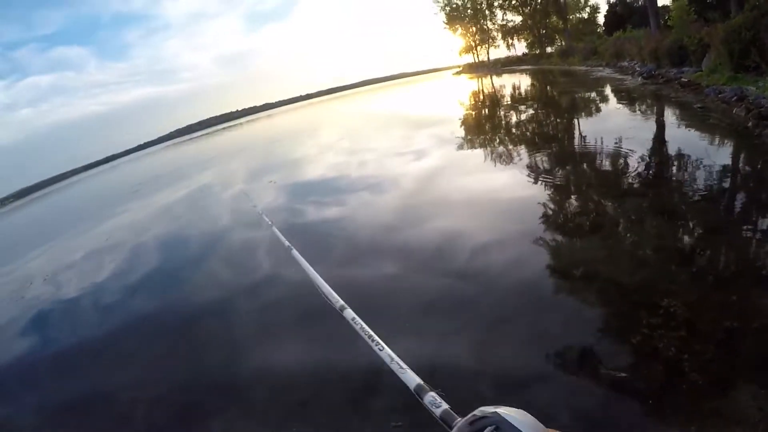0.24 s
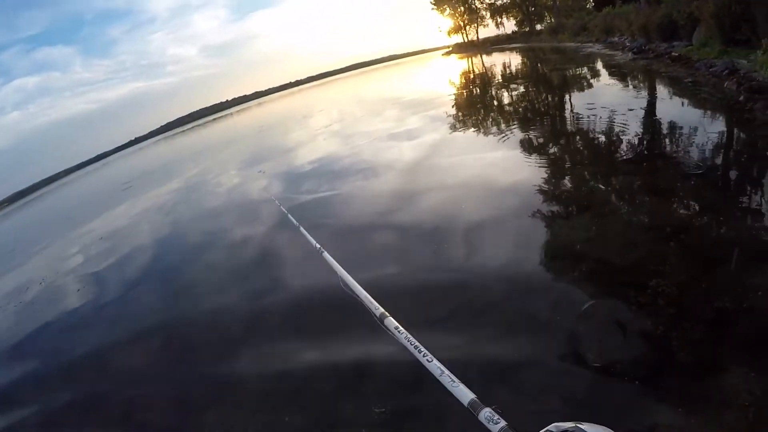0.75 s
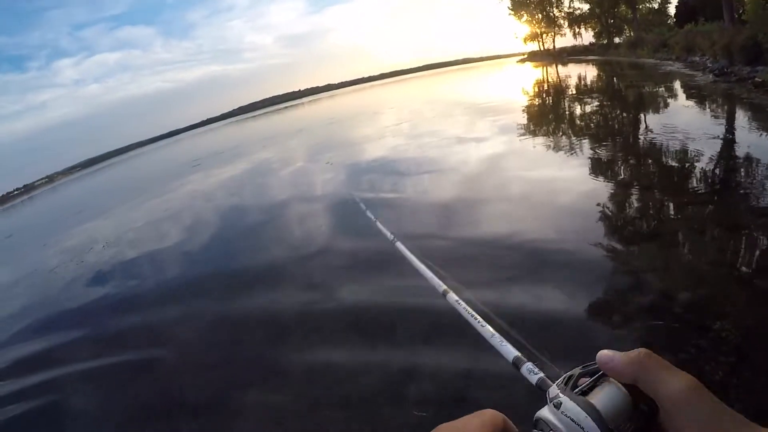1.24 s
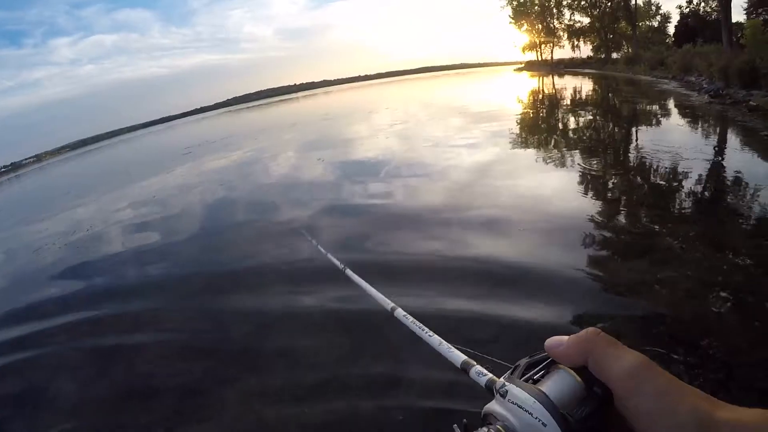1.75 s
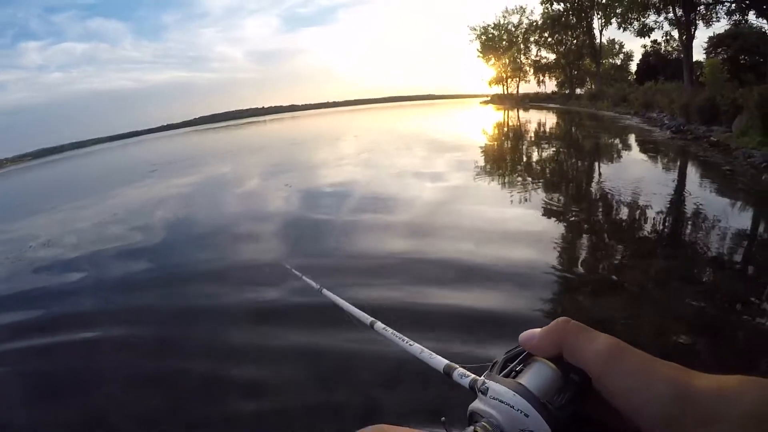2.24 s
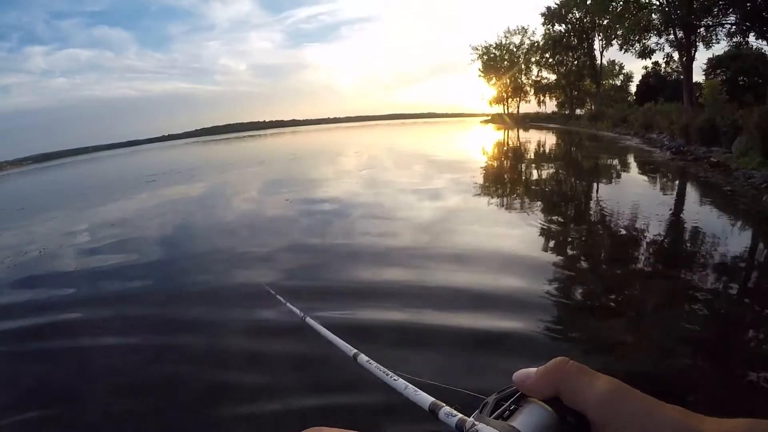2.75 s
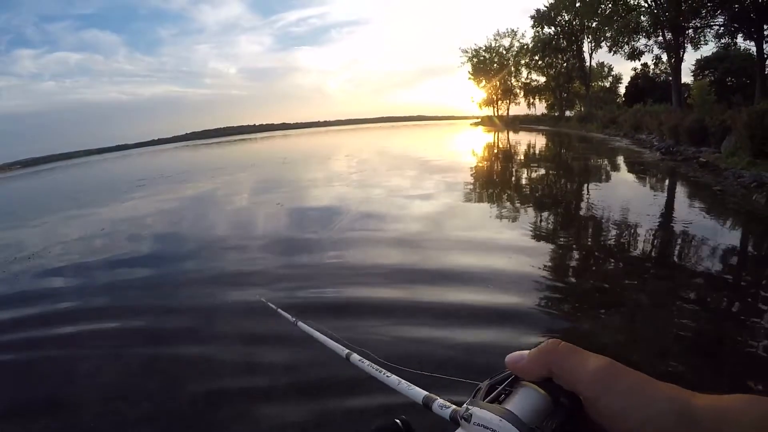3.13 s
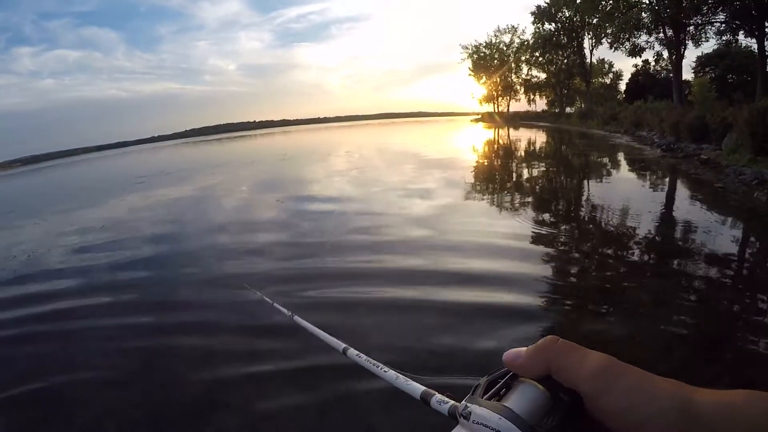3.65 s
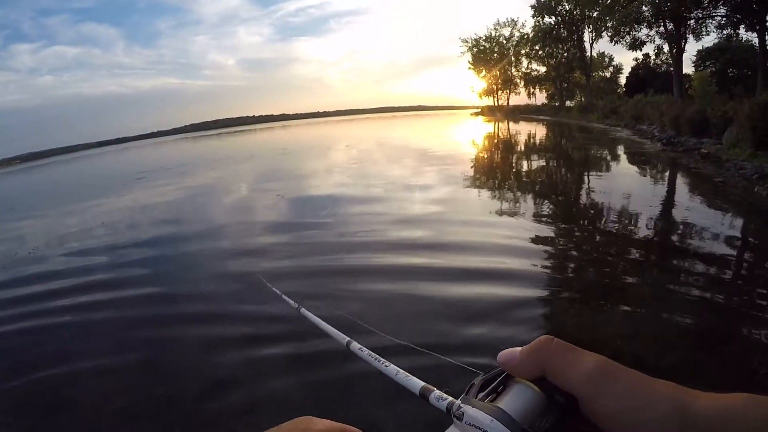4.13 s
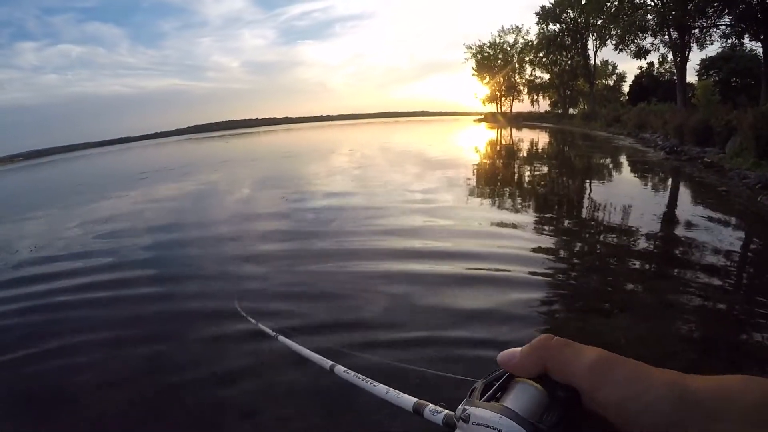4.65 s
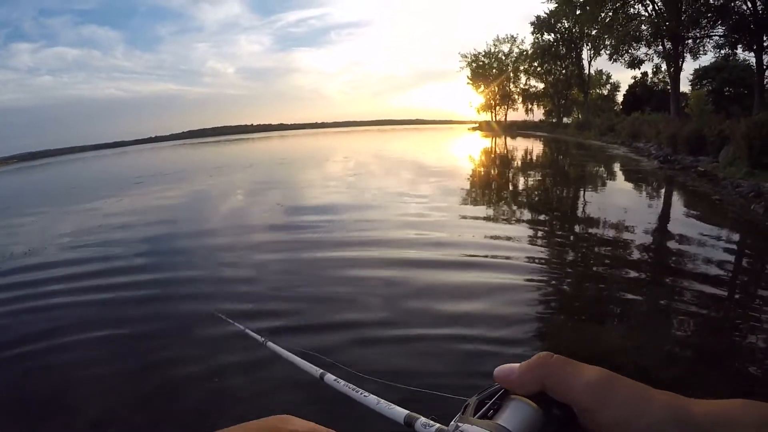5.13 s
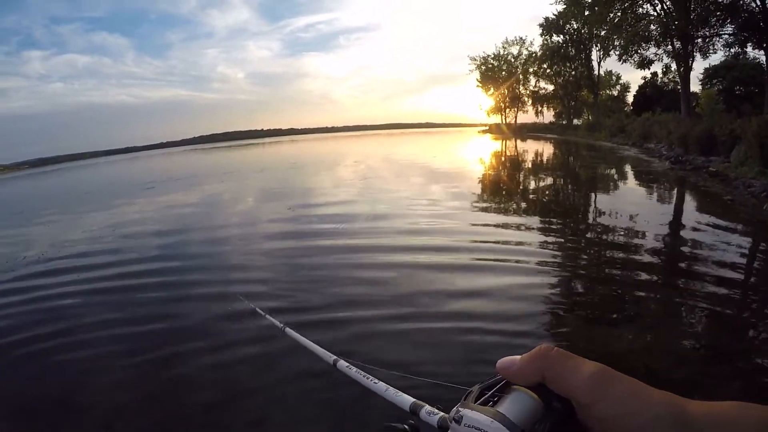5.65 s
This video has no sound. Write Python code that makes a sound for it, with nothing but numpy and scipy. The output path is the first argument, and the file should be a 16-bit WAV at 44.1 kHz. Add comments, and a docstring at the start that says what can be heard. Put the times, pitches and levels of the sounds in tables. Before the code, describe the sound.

Water plops and bubbles beside a lake, a fishing reel clacks sharply into gear, then faint winding continues under insects and low wind.

```python
"""Winding in a line on a calm lake shore

Filtered noise gives the wind, with buffeting below and rush above, over a far motor's wavering sines.
Insects ring from the trees as noise bands and steady singers; a nearer caller rasps in chirps.
Water sloshes as random grains and chirped bubbles, while drops and ticks are short contact bursts.
The reel engages with a clack of seven blows, damped modes and a short rough burst; noise bands form
the line's whisper, the rub of the crank and the faint whirr of the gears."""
import sys
import numpy as np
from scipy import signal
from scipy.fft import rfft, irfft, next_fast_len
from scipy.io import wavfile

SR = 44100
rng = np.random.default_rng(int(sys.argv[2]) if len(sys.argv) > 2 else 0)


def to_wav(sig):
    """Store sig (one row per channel, or 1-D mono) as 16-bit WAV at the path in sys.argv[1].

    Samples outside -1..1 are clipped; the rate is SR.
    """
    pcm = np.clip(np.atleast_2d(sig), -1, 1) * 32767
    pcm = np.round(pcm).astype(np.int16)
    wavfile.write(sys.argv[1], SR, pcm.T)  # frames by channels


N = 259749
TIME = np.arange(N) / SR
KHZ = 1000  # reference frequency [Hz]

# Wind spectrum: (frequency [Hz], relative density [dB per Hz])
WIND_SPECTRUM = [(7.1, -48), (12, -1), (27, -1.5), (69, 1.5), (91, -3), (119, -4.5), (191, -14),
                 (237, -13.5), (356, -20), (391, -20), (661, -29), (728, -30), (800, -29), (1420, -41),
                 (3600, -48), (4680, -77), (7920, -120)]
# Gusts and lulls: (middle [s], length [s], change of buffeting [dB], change of rush [dB])
WIND_GUSTS = [(1.848, 0.52, -2, 0), (3.122, 1, 1.5, 0.5), (3.617, 0.52, 4, -1.5), (4.557, 0.51, 0, 1),
              (4.877, 0.58, 2, 0.5), (5.6, 1, 1.5, 0)]
BUFFET_DB, RUSH_DB, HISS_DB = -39, -47, -71  # steady breeze, before gusts and wander
BUFFET_SPLIT_HZ = 160  # buffeting below, rush above

# Lines of the far motor's hum: (frequency [Hz], level [dB])
MOTOR_LINES = [(112.6, -50), (243, -60)]

# Insect chorus spectrum: (frequency [Hz], relative density [dB per Hz])
CHORUS_SPECTRUM = [(2500, -31), (3600, -18), (4000, -11), (4300, -7), (4700, -3.5), (5350, -5), (6000, -2),
                   (6600, -1.5), (7400, -4), (8200, -7), (8700, -10.5), (9300, -11.5), (9700, -22),
                   (11000, -34)]
# Chorus loudness, shared by crowd and caller: (time [s], level against CHORUS_OFFSET_DB [dB])
CHORUS_LEVEL = [(0.0, -55), (0.26, -54), (0.72, -51.5), (1.2, -53.5), (2.23, -53), (3.23, -52),
                (5.35, -52.5), (5.89, -52)]
# Single insects that stand out: (frequency [Hz], level [dB])
STEADY_SINGERS = [(4577, -73), (4643, -73), (4812, -77), (5130, -78), (5879, -74), (6540, -73), (6659, -71),
                  (6750, -73), (7218, -77), (7387, -77), (7456, -76), (7768, -77), (9232, -85)]
# Pitches favoured by many insects: (frequency [Hz], half-width [Hz], level [dB])
PITCH_CLUSTERS = [(4640, 70, -66), (6670, 110, -63)]
# Pace of the nearest insect: (time [s], rate [chirps per s])
CALLER_PACE = [(0, 12.15), (1.6, 12.15), (1.9, 11.88), (3.6, 11.92), (4, 11.62), (5.89, 11.35)]
CHORUS_OFFSET_DB, CALLER_DB = -0.37, -7.5  # the caller is set against the crowd
TOOTH_HZ, TOOTH_DEPTH, STROKE_DUTY = 345, .4, 0.77  # mean strike rate, depth, sounding share of a chirp
SINGER_HALF_WIDTH_HZ = 9.1

# Slosh spectrum: (frequency [Hz], relative density [dB per Hz])
SLOSH_SPECTRUM = [(220, -28), (350, 0), (600, 2), (950, -0.5), (1250, -2), (1550, -0.5), (2400, -6.5),
                  (3000, -11), (4200, -11.5), (7000, -29), (14000, -45)]
# Sloshes of water, and last a short rough burst under the reel's clack:
# (start [s], length [s], strength [dB])
SLOSH_EVENTS = [(-.01, 0.38, -49), (0.406, 0.07, -46), (0.46, 0.23, -37.5), (0.687, 0.143, -43),
                (0.858, 0.034, -39)]
# Single bubbles: (start [s], peak level [dB], starting pitch [Hz], rise [octaves])
SINGLE_BUBBLES = [(-.003, -45, 1720, 0), (.09, -37, 1205, 1.0), (.121, -44, 1450, 0),
                  (.125, -39.5, 920, 0.33), (0.161, -47, 1740, 0.077), (0.386, -44, 1140, 0.55),
                  (.407, -38, 1900, .05), (0.419, -35.5, 440, 0.42), (.436, -37.5, 710, 0.34),
                  (.46, -41, 5100, 0), (0.487, -33, 1490, 0.061), (.53, -39, 4370, 0.098),
                  (0.559, -49, 1500, 0.21), (.56, -39, 4930, 0.045), (.695, -31.5, 614, 0.065),
                  (.697, -42, 1004, 0.97), (0.727, -37.5, 1180, .49), (.773, -39.5, 1640, 0.098),
                  (5.179, -56, 3350, .05)]
SLOSH_RISE_S, SLOSH_SAG_DB_PER_S, SLOSH_RELEASE_DB_PER_S = 0.013, 41, 250
SPRAY_GRAINS_PER_S, SPRAY_DB, FROTH_DB = 700, -5.5, -3.5  # levels against the slosh strength
FROTH_S, FROTH_BUBBLES, FROTH_CYCLES = 1.1, 600, 16  # cycles at the starting pitch
LIFE_S, LIFE_SLOPE = 0.013, 0.65  # life of a steady 1 kHz bubble, power law of its shortening
CLIMB_OCTAVES_PER_S = 120  # a climbing bubble lasts longer by rise / this rate

# Pulls on the crank: (middle [s], length [s], line whisper [dB], crank drive [dB])
CRANK_PULLS = [(0.524, 0.13, -65, -70), (0.758, 0.28, -66, -63), (0.988, 0.43, -72, -57.5),
               (1.64, 0.11, -74, -54.5), (2.09, 0.086, -70, -58), (2.994, .14, -71, -60),
               (4.28, 0.099, -75, -58.5), (4.64, 0.083, -70, -66), (5.035, 0.085, -77, -62),
               (5.838, .18, -71, -55)]
PULL_EDGE_DB, LINE_DB = -10, -80  # a pull's level at its ends; the line's floor between pulls
RUB_DB, WHIRR_DB = -8, -14.5  # both against the crank drive
WHIRR_HZ, WHIRR_HALF_WIDTH_HZ = 2190, 110

# Droplets falling back on the lake: (time [s], nominal peak [dB], centre [Hz])
DROPLETS = [(.033, -41, 2900), (.051, -39.5, 2700), (.421, -25, 520), (.477, -28.5, 3070),
            (.483, -31, 1900), (.494, -32, 5030), (.528, -30.5, 2600), (.638, -40, 2800),
            (.696, -31.5, 2500), (.723, -32.5, 2200), (.762, -37, 1700), (.817, -33, 2000),
            (.825, -34.5, 3000)]
DROP_OCTAVES, DROP_T60_S = 0.59, 0.019

# Light ticks of line and reel: (time [s], nominal peak [dB], centre [Hz])
LIGHT_TICKS = [(.089, -41, 13000), (.8663, -27.5, 3000), (1.629, -46.5, 12000), (1.98, -40, 2400),
               (2.2, -48, 13000), (2.217, -40, 2200), (2.337, -44, 2400), (2.49, -37.5, 3000),
               (2.542, -45, 11000), (3.028, -48, 10500), (3.183, -43.5, 2600), (3.548, -43, 1900),
               (3.898, -44, 11500), (5.533, -55, 11000), (5.62, -45, 2700)]
TICK_OCTAVES, TICK_NARROWING, TICK_T60_S = 1.4, 0.53, 0.0057  # width at 1 kHz, its power law, decay

# Blows as the reel engages: (time [s], nominal peak [dB], tilt [dB per octave, well above 1 kHz],
# scrape t60 [s])
CLACK_BLOWS = [(.8848, -19, 5, .0035), (.8856, -9, 4.5, .0037), (.8869, -12, -.5, .022),
               (.8889, -5.5, .5, .0053), (.889, -17, -4, .014), (.8961, -25, -13, .0057),
               (.8976, -26, -13, .0083)]
# Colour of the reel's shell: (frequency [Hz], relative level [dB])
SHELL_SPECTRUM = [(150, -32), (350, -28), (650, -10), (1400, -13), (1880, -0.5), (2700, -4), (3400, 2),
                  (4400, -2), (5000, 2.5), (5700, -4), (7500, -7.5), (12000, -9), (15500, -17)]
# Reel and rod modes after the loudest blow: (frequency [Hz], level [dB], t60 [s])
RING_MODES = [(720, -19.5, 0.028), (844, -27, 0.054), (1010, -30.5, 0.084), (1177, -29, 0.068),
              (1900, -21, 0.012), (2013, -44, 0.046), (3400, -24, 0.029), (5660, -18, 0.0068),
              (8000, -37, 0.027)]

EDGE_HZ = 15450  # upper band limit of the recorder


def gain_of(db):
    """Logarithmic level: 20 dB is a tenfold amplitude."""
    return 10 ** (np.asarray(db) / 20)


def evened(x):
    """Power normalisation to rms 1."""
    return x / np.sqrt(np.mean(x ** 2) + 1e-20)


def read(points, hz):
    """Spectral gain by interpolation of level over logarithmic frequency."""
    f, db = np.transpose(points)
    return gain_of(np.interp(np.log(hz + 1), np.log(f + 1), db))


def hump(hz, centre_hz, octaves):
    """Broad resonance: a Gaussian bell over octaves."""
    distance = np.log2((hz + 1) / centre_hz) / octaves
    return np.exp(-.5 * distance ** 2)


def coloured(x, shape):
    """Linear filtering: multiplication by a gain in the frequency domain, then scaling to rms 1."""
    size = next_fast_len(len(x))
    spectrum = rfft(x, size) * shape(np.fft.rfftfreq(size, 1 / SR))
    return evened(irfft(spectrum, size)[:len(x)])


def noise(shape):
    """Stationary Gaussian noise with a given spectral shape, rms 1."""
    return coloured(rng.standard_normal(N), shape)


def drift(per_s):
    """Slow random wander of rms 1: noise low-passed near the given rate."""
    return noise(lambda f: 1 / (1 + (f / per_s) ** 4))


def whistle(hz, half_width_hz):
    """Narrow-band noise, heard as a fuzzy tone of rms 1."""
    return noise(lambda f: 1 / (1 + ((f - hz) / half_width_hz) ** 2))


def tone(hz):
    """Phase is the integral of frequency, so a moving pitch stays continuous."""
    return np.sin(2 * np.pi * np.cumsum(hz) / SR)


def add(mix, s, sound):
    """Superposition: a sound is summed into the mix at time s."""
    start = round(s * SR)
    sound = sound[max(-start, 0):]
    part = mix[max(start, 0):][:len(sound)]
    part += sound[:len(part)]


def burst(t60, shape, snap=2.9, size=4096):
    """Contact excitation: an impulse and a decaying scrape, filtered by a body; peak about 1."""
    t = (np.arange(size) - size // 2) / SR  # contact at the middle of the array
    fall = (t > 0) * gain_of(-60 * abs(t) / t60)
    force = snap * (t == 0) + rng.choice([-1., 1.], size) * fall
    return coloured(force, shape) * np.sqrt(np.mean(force ** 2)) / 2


def contacts(rows, width, t60, snap):
    """Series of brief contacts, each a resonance whose width in octaves may depend on pitch."""
    out = np.zeros(N)
    for s, db, hz in rows:
        contact = burst(t60, lambda f: hump(f, hz, width(hz)), snap)
        add(out, s - len(contact) / 2 / SR, gain_of(db) * contact)
    return out


def swell(middle, length):
    """Raised-cosine window over time, 1 at its middle and 0 at its ends."""
    return np.cos(np.pi * np.clip((TIME - middle) / length, -.5, .5)) ** 2


def wind():
    """Turbulent noise: low buffeting at the microphone, a softer rush above it and a thin hiss."""
    low = lambda f: 1 / np.sqrt(1 + (f / BUFFET_SPLIT_HZ) ** 8)
    high = lambda f: np.sqrt(1 - low(f) ** 2)  # power complement of the low band
    buffet_gusts, rush_gusts = sum(
        np.outer(change, swell(s, length)) for s, length, *change in WIND_GUSTS)
    buffet = noise(lambda f: read(WIND_SPECTRUM, f) * low(f))
    buffet *= gain_of(BUFFET_DB + buffet_gusts + 0.67 * drift(11.5))
    rush = noise(lambda f: read(WIND_SPECTRUM, f) * high(f))
    rush *= gain_of(RUSH_DB + rush_gusts + drift(15.6))
    hiss = noise(lambda f: read([(1500, -26), (3500, 4), (10000, 3.5), (15000, -5)], f))
    return buffet + rush + gain_of(HISS_DB) * hiss


def motor():
    """Line spectrum of a far motor: low sines wandering slightly in pitch and level."""
    out = np.zeros(N)
    for hz, db in MOTOR_LINES:
        strength = gain_of(db + 0.91 * drift(3.9)) * np.sqrt(2)  # sine of rms 1
        out += strength * tone(hz + 1.204 * drift(2.3))
    return out


def rasp(near):
    """Stridulation: teeth drawn over a scraper modulate noise within each swelling wing stroke."""
    turns = np.cumsum(np.interp(TIME, *np.transpose(CALLER_PACE))) / SR
    stroke = np.sin(np.pi * np.minimum(turns % 1 / STROKE_DUTY, 1) ** 1.5)
    teeth = 1 + TOOTH_DEPTH * np.cos(2 * np.pi * np.cumsum(TOOTH_HZ + 2 * drift(4.3)) / SR)
    return gain_of(CALLER_DB) * evened(near * stroke * teeth)


def chorus():
    """Incoherent sum of a far insect crowd, a nearer caller, single singers and pitch clusters."""
    frames = dict(fs=SR, nperseg=4096, noverlap=3072)
    hz, t, z = signal.stft(rng.standard_normal((2, N)), **frames)
    # many pitches and many paths: narrow ridges that fade in and out slowly
    grid = rng.standard_normal((len(hz) + 4, len(t) + 89))
    ridges = signal.oaconvolve(grid, np.outer(np.hanning(5), np.hanning(90)), "valid")
    ripple = gain_of(4.5 * np.clip(evened(ridges), -2, 2))
    z = z * read(CHORUS_SPECTRUM, hz)[:, None] * ripple
    far, near = signal.istft(z, **frames)[1][:, :N]
    loudness = gain_of(np.interp(TIME, *np.transpose(CHORUS_LEVEL)) + CHORUS_OFFSET_DB)
    crowd_and_caller = loudness * (evened(far) + rasp(near))
    singers = sum(gain_of(db) * whistle(hz, SINGER_HALF_WIDTH_HZ) for hz, db in STEADY_SINGERS)
    clusters = sum(gain_of(db) * whistle(hz, width) for hz, width, db in PITCH_CLUSTERS)
    return crowd_and_caller + singers + clusters


def bubble(hz, octaves, life):
    """Bubble resonance: a brief ring whose pitch climbs as the bubble nears the surface."""
    u = np.arange(0, 1, 1 / (life * SR))  # fraction of its life
    return np.sin(np.pi * u ** 0.38) * tone(hz * 2 ** (octaves * u))


def slosh(start, length, db):
    """Envelope of one burst: a fast rise, a sagging hold and a steep exponential release."""
    t = np.maximum(TIME - start, 0)
    release = SLOSH_RELEASE_DB_PER_S * np.maximum(t - length, 0)
    return np.minimum(t / SLOSH_RISE_S, 1) * gain_of(db - SLOSH_SAG_DB_PER_S * t - release)


def spray():
    """Shot noise: sparse random impulses of unequal size, coloured as water; rms 1."""
    sizes = gain_of(2.5 * np.minimum(rng.exponential(1, N), 3)) * rng.choice([-1., 1.], N)
    struck = rng.random(N) < SPRAY_GRAINS_PER_S / SR
    return coloured(sizes * struck, lambda f: read(SLOSH_SPECTRUM, f))


def froth():
    """Superposed bubble resonances: small bubbles ring higher and die sooner; rms 1."""
    out = np.zeros(round(FROTH_S * SR))
    for when, smallness, rise, depth in rng.random((FROTH_BUBBLES, 4)):
        hz = 380 * 9 ** smallness
        ring = bubble(hz, 0.36 * rise, FROTH_CYCLES / hz)
        add(out, when * len(out) / SR, gain_of(-12 * depth) * hz * ring)
    return coloured(out, lambda f: read(SLOSH_SPECTRUM, f))


def water():
    """Amplitude modulation of spray and froth in bursts, with single bubble resonances on top."""
    out = gain_of(SPRAY_DB) * spray()
    add(out, 0, gain_of(FROTH_DB) * froth())
    out *= np.max([slosh(*row) for row in SLOSH_EVENTS], axis=0)
    for s, db, hz, octaves in SINGLE_BUBBLES:
        life = LIFE_S * (hz / KHZ) ** -LIFE_SLOPE + abs(octaves) / CLIMB_OCTAVES_PER_S
        add(out, s, gain_of(db) * bubble(hz, octaves, life))
    return out


def winding():
    """Friction noise: line whispers onto the spool; at each pull the crank rubs and the gears whirr."""
    run, crank = np.zeros((2, N))
    for s, length, run_db, crank_db in CRANK_PULLS:
        pull = gain_of(PULL_EDGE_DB * (2 * (TIME - s) / length) ** 2)
        run += gain_of(run_db) * pull
        crank += gain_of(crank_db) * pull
    line = noise(lambda f: hump(f, 10600, 0.45)) * gain_of(4.4 * drift(70))
    line *= np.hypot(run, gain_of(LINE_DB))  # powers of pulls and floor add
    rub = noise(lambda f: hump(f, 1840, 1.0)) * gain_of(1.6 * drift(60))
    whirr = whistle(WHIRR_HZ, WHIRR_HALF_WIDTH_HZ)
    return line + crank * (gain_of(RUB_DB) * rub + gain_of(WHIRR_DB) * whirr)


def droplets():
    """Impact excitation: drops patter on the surface as short bursts of equal width in octaves."""
    return contacts(DROPLETS, lambda hz: DROP_OCTAVES, DROP_T60_S, snap=2.5)


def ticks():
    """Impact excitation: line and reel tick lightly, the higher ticks in narrower bands."""
    width = lambda hz: TICK_OCTAVES * (hz / KHZ) ** -TICK_NARROWING
    return contacts(LIGHT_TICKS, width, TICK_T60_S, snap=5.2)


def clack():
    """Modal excitation: the catch slips and slams home; reel and rod ring as damped sines."""
    out = np.zeros(N)
    for s, db, tilt_db, t60 in CLACK_BLOWS:
        blow = burst(t60, lambda f: read(SHELL_SPECTRUM, f) * gain_of(tilt_db * np.log2(f / KHZ + 1)))
        add(out, s - len(blow) / 2 / SR, gain_of(db) * blow)
    loudest_s = max(CLACK_BLOWS, key=lambda row: row[1])[0]
    t = np.arange(SR // 5) / SR
    for k, (hz, db, t60) in enumerate(RING_MODES):
        mode = gain_of(db - 60 * t / t60) * np.sin(2 * np.pi * hz * t)
        add(out, loudest_s, mode * (-1) ** k)  # alternate polarity
    return out


def scene():
    """Superposition of all sources at one microphone."""
    air = wind() + motor() + chorus()
    lake = water() + droplets()
    tackle = winding() + ticks() + clack()
    return (air + lake + tackle)[None]


def record(dry):
    """Band limiting: a linear-phase low-pass filter stands for the recorder."""
    lowpass = signal.firwin(511, EDGE_HZ, window=("kaiser", 9), fs=SR)
    return signal.oaconvolve(dry, lowpass[None], "same")


dry = scene()
out = record(dry)
to_wav(out)
```